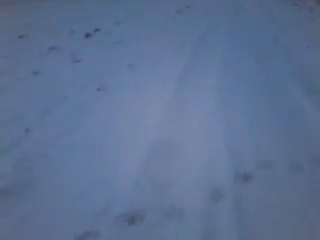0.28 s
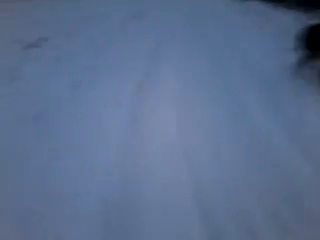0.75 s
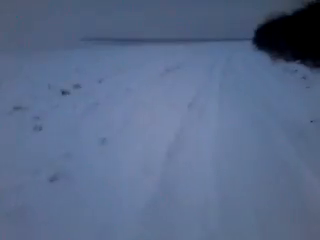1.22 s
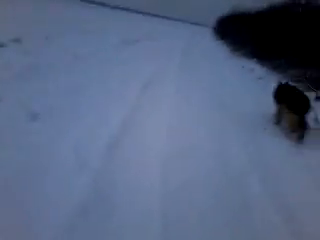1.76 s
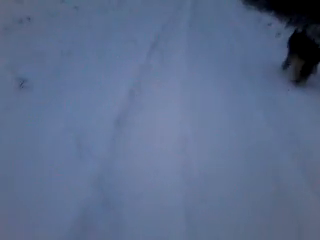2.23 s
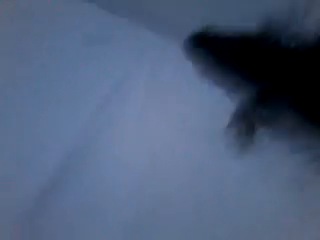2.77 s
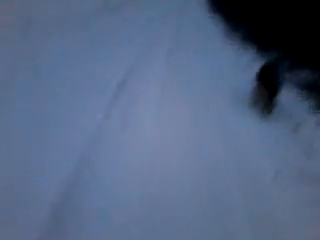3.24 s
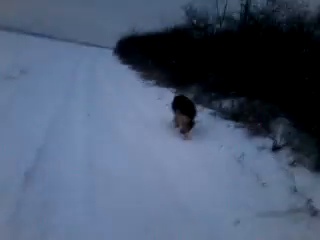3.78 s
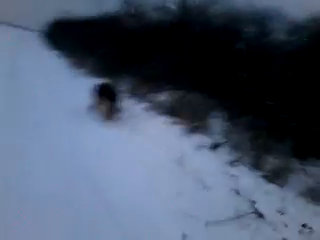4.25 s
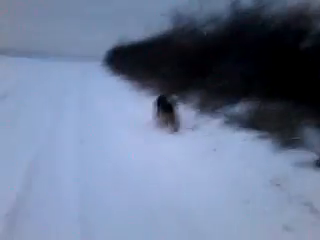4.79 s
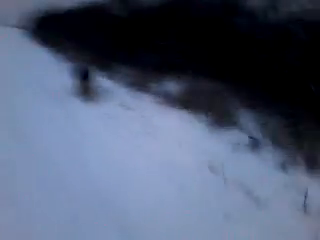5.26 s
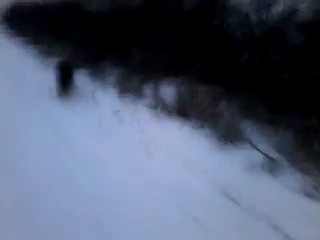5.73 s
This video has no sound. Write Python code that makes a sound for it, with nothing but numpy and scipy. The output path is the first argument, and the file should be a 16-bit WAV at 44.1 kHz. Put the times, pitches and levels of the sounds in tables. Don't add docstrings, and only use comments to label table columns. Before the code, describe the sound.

Footsteps in snow, heard close and dry through a cheap handheld microphone. Fabric brushes and snaps near the start; crust cracks and loose snow slides underfoot, strongest around the middle. The steps then soften to faint packing and rubbing. A sudden burst of loud bumps and harsh dragging follows, then crisp breaking snow and muffled tapping, over thin hiss and a faint high whine.

```python
import sys
import numpy as np
from scipy import signal
from scipy.fft import rfft, irfft
from scipy.io import wavfile
from scipy.ndimage import uniform_filter1d

SR = 44100
rng = np.random.default_rng(int(sys.argv[2]) if len(sys.argv) > 2 else 0)


def transcribe(u):
    v = np.clip(np.atleast_2d(u).T, -1, 1)
    q = np.round(v * 32767).astype(np.int16)
    wavfile.write(sys.argv[1], SR, q)


def undo_db(level):
    steps = np.asarray(level, float) / 20
    return 10 ** steps


N = 265041

PORT_HZ, PORT_WIDTH_HZ = 6400, 1200


def rms_one(x):
    return x / np.sqrt(np.mean(x ** 2) + 1e-20)


def drift(rate_hz):
    r = np.exp(-2 * np.pi * rate_hz / SR)
    wander = signal.lfilter([1], [1, -2 * r, r * r], rng.standard_normal(N + SR))
    return rms_one(wander[SR:])


def coloured(x, spectrum):
    hz, db = np.transpose(spectrum)
    at = np.log(np.fft.rfftfreq(N, 1 / SR) + 1)
    weight = undo_db(np.interp(at, np.log(hz), db, left=-70, right=-70))
    return rms_one(irfft(rfft(x) * weight, N))


def resonance(x, hz, width_hz):
    r = np.exp(-np.pi * width_hz / SR)
    poles = [1, -2 * r * np.cos(2 * np.pi * hz / SR), r * r]
    return signal.lfilter(np.array([1, 0, -1]) * (1 - r * r) / 2, poles, x)


def twice_resonant(x, hz, width_hz):
    return resonance(resonance(x, hz, width_hz), hz, width_hz)


def add(out, s, wave):
    at = max(round(s * SR), 0)
    out[at:at + len(wave)] += wave[:N - at]


def electronics(swish_db):
    # frequency in Hz, hiss density in dB per Hz.
    hiss_spectrum = [(30, 0), (60, -19), (150, -3), (300, -6.5), (1000, -10.5), (2300, -13.5),
                     (4200, -17.5), (6500, -11), (9000, -14.5), (15500, -19)]
    t = np.arange(N) / SR
    gate = undo_db(0.61 * (np.clip(swish_db, -85, -60) + 74.0))
    frame = t * 14.896 % 1
    busy = uniform_filter1d(((frame < .135) | (frame > .445)) * 1., size=90)
    whine = undo_db(-67.5) * busy * np.sin(2 * np.pi * 13000 * t)
    fuzz = undo_db(-80) * rms_one(resonance(rng.standard_normal(N), 13780, 150))
    hiss = undo_db(-69) * coloured(rng.standard_normal(N), hiss_spectrum)
    return gate * (hiss + whine + fuzz)


def strokes(rows):
    s, db, swell_ms, fade_ms = np.transpose(rows)[:, :, None]
    late_ms = np.arange(N * 1000 // SR + 2) - 1000 * s
    distance = np.where(late_ms < 0, -late_ms / swell_ms, late_ms / fade_ms)
    return np.sum(undo_db(db - 20 * distance ** 1.05) ** 2, axis=0)


def rubbing():
    # time of the peak in seconds, peak in dB, swell in ms, fade in ms.
    brushes = [(0.035, -60.5, 8.5, 86), (0.206, -59.5, 28, 31), (0.29, -53.5, 47, 130),
               (0.456, -63.5, 15, 120), (0.593, -41.5, 37, 58), (0.776, -30, 27.6, 7.1),
               (0.79, -51, 10, 55), (2.816, -40, 19, 39), (2.94, -66, 55, 66), (0.345, -52, 22, 28),
               (3.49, -61, 32, 25), (4.585, -54, 29, 40), (5.63, -48, 31, 26), (4.85, -28, 106, 18),
               (4.76, -27, 28, 64), (3, -60, 10, 12), (5.028, -25, 70, 8), (4.95, -28, 10, 50),
               (4.9, -50, 20, 22), (0.57, -42.5, 6.8, 44)]
    grinds = [
        (0.036, -57, 7.2, 37),
        (1.14, -65, 19, 84),
        (1.541, -55, 5, 44),
        (2.501, -48, 127, 147),
        (2.72, -48.5, 22, 21),
        (2.99, -55.5, 33, 52),
        (3.8, -66, 15, 13),
        (2.515, -50, 30, 30),
        (0.665, -62, 20, 54),
        (4.862, -40, 60, 6),
    ]
    packing = [(0.038, -57, 40, 48), (0.205, -69, 47, 62), (0.3, -40.5, 38, 61), (0.581, -65, 15, 550),
               (0.786, -65, 15, 140), (0.94, -57.5, 93, 130), (1.22, -63, 240, 250), (1.388, -77, 26, 26),
               (1.515, -47.5, 14, 81), (1.697, -49, 34, 32), (1.958, -57, 170, 360), (2.055, -47, 12, 33),
               (2.22, -53, 300, 200), (2.385, -53, 180, 1100), (2.66, -48.5, 340, 560),
               (2.816, -46, 18, 120), (2.985, -47.5, 52, 29), (3.081, -52.5, 13, 105),
               (3.183, -49, 9.3, 100), (3.322, -54.5, 110, 290), (3.532, -46, 14, 78),
               (3.725, -50.5, 82, 120), (3.87, -53.5, 130, 250), (4.27, -44.5, 78, 390),
               (5.25, -48, 95, 790), (5.457, -30.5, 33, 35), (5.537, -46, 76, 380), (5.679, -47, 17, 930),
               (5.905, -46, 99, 29), (6.009, -54, 45, 100)]
    slides = [(0.94, -48.5, 66, 84), (1.197, -64, 140, 175), (1.382, -53, 5, 60), (1.515, -57.5, 14, 390),
              (1.636, -50, 160, 66), (1.958, -48.5, 108, 150), (2.105, -65, 19, 230), (2.288, -49, 10, 50),
              (2.39, -46.5, 69, 150), (2.534, -52, 170, 90), (2.724, -57, 62, 530), (2.87, -49, 120, 25),
              (2.99, -60, 39, 54), (3.078, -48.5, 20, 47), (3.183, -68, 30, 360), (2.215, -57, 15, 200),
              (3.49, -64.5, 460, 150), (3.72, -65.5, 79, 170), (3.861, -59.5, 150, 250),
              (4.101, -56.5, 44, 39), (4.27, -58.5, 41, 420), (4.39, -48, 103, 140), (4.495, -51, 68, 60),
              (0.655, -56, 15, 46), (5.365, -44.5, 60, 60), (1.605, -50, 30, 60), (2.13, -57, 20, 45),
              (4.583, -53, 17, 19), (2.005, -45, 12, 24), (5.268, -54, 32, 900), (5.43, -43, 200, 110),
              (5.511, -49, 6, 130), (5.679, -43, 5.5, 9), (5.725, -47.5, 23, 81), (5.905, -52, 87, 29),
              (6.009, -61.5, 46, 100)]
    drags = [
        (4.688, -25.5, 2.7, 144),
        (4.707, -22.5, 15, 44),
        (4.76, -33, 61, 33),
        (4.855, -38.5, 72, 27),
        (4.9, -50, 37, 18),
        (4.936, -23.5, 2.9, 55),
        (4.99, -31, 18, 45),
        (5.021, -28.5, 41, 20),
        (5.035, -42, 20, 15),
    ]
    kinds = [(packing, (-1.5, -15.5, -42, -23)), (slides, (-40, -7.5, -1.5, -8)),
             (brushes, (-38, -16.5, -11, -2.5)), (drags, (-5.5, -7, -1.5, -3)),
             (grinds, (-16, 4.5, -2.5, -7))]
    power = undo_db(-84) ** 2
    for rows, mix_db in kinds:
        power = power + undo_db(mix_db)[:, None] ** 2 * strokes(rows)
    ms = np.arange(N) / SR * 1000
    return [np.interp(ms, np.arange(len(p)), 10 * np.log10(p)) for p in power]


def grains(per_s, spread_db, clump):
    sizes = undo_db(spread_db * np.minimum(rng.exponential(1, N), 4)) * rng.standard_normal(N)
    return sizes * (rng.random(N) < per_s * clump / SR)


def lumps(levels_by_hz, per_s, clump, cycles):
    hz, db = np.transpose(levels_by_hz)
    pitches = np.geomspace(hz[0], hz[-1], num=12)
    dealt = rng.integers(0, 12, N)
    hits = grains(per_s, 1.6, clump) + 1e-18
    levels = undo_db(np.interp(np.log(pitches), np.log(hz), db))
    total = np.zeros(N)
    for k, (f, level) in enumerate(zip(pitches, levels)):
        total += level * rms_one(twice_resonant(hits * (dealt == k), f, f / cycles))
    return rms_one(total)


def tilted(x):
    # time in seconds, level of the upper half over the lower in dB.
    fineness_by_time = [(1.5, 0), (1.65, -3), (1.95, 1), (4.4, 2), (4.7, -2), (4.84, 5), (4.95, 0),
                        (5.03, 2), (5.34, 3), (5.44, -5), (5.52, 0)]
    half_db = np.interp(np.arange(N) / SR, *np.transpose(fineness_by_time)) / 2
    split = signal.butter(5, 6200, fs=SR, output="sos")
    low = signal.sosfiltfilt(split, x)
    return low * undo_db(-half_db) + (x - low) * undo_db(half_db)


def friction(rumble_db, crunch_db, rustle_db, swish_db):
    # frequency in Hz, level of a lump ringing there in dB.
    rumble_levels = [(70, -7), (200, -3.5), (450, 0.5), (1100, -9)]
    crunch_levels = [(900, -1), (1500, 1.5), (2200, 1), (3200, 0), (4600, -9.5)]
    # frequency in Hz, density in dB per Hz.
    rustle_spectrum = [(3000, -17), (4500, -10.5), (5600, -5), (6600, -1), (7800, -7), (9300, -15),
                       (11000, -49)]
    swish_spectrum = [(5500, -30), (7500, -9), (9000, -5), (10300, 0), (12300, -4.5), (14700, -3.5),
                      (15600, -9)]
    uneven = np.interp(swish_db, [-47.5, -31.5], [1, .35])
    flurry = uneven * (1.9 * drift(40) + 2.9 * drift(90))
    clump = undo_db(2.3 * uneven * drift(60))
    rumble_gain = undo_db(rumble_db - 4.5 + 0.8 * drift(30) + 0.3 * flurry)
    rumble = lumps(rumble_levels, 600, clump, cycles=2.18) * rumble_gain
    crunch = lumps(crunch_levels, 8000, clump, cycles=1.36) * undo_db(crunch_db - 3.5 + 0.43 * flurry)
    rustle = tilted(coloured(grains(12000, 2.0, clump), rustle_spectrum))
    rustle = rustle * undo_db(rustle_db + 0.5 + 0.6 * flurry)
    swish = coloured(grains(20000, 1.5, clump), swish_spectrum) * undo_db(swish_db - 2.0 + .45 * flurry)
    return rumble + crunch + rustle + swish


def cracks(rows, ms, breadth=.9, port=1.2):
    out, t = np.zeros(N), np.arange(round(.03 * SR)) / SR
    splinters = np.exp(-t / .004)
    fall = ms / 1000 / 2.2
    noise = rng.standard_normal((len(rows), len(t)))
    for (s, db, hz), burst in zip(rows, noise):
        width = breadth * hz
        click = 1.8 * np.sqrt(fall * SR) * np.sign(burst[0]) * (t == 0) / 2
        snap = twice_resonant(burst * np.exp(-t / fall) + click, hz, width)
        snap = snap + port * resonance(snap, PORT_HZ, PORT_WIDTH_HZ)
        tail = rms_one(twice_resonant(burst, hz, width)) * splinters
        add(out, s - fall / 2, undo_db(db - 5.5) * (snap / np.abs(snap).max() + undo_db(-15) * tail))
    return out


def thuds(rows, cycles, rough=.36, grit=.02, weight=.2):
    out, t = np.zeros(N), np.arange(round(.09 * SR)) / SR
    noise, start = rng.standard_normal((len(rows), len(t))), rng.random(len(rows))
    for (s, db, hz), puff, turn in zip(rows, noise, start):
        rise = cycles / hz / 2.4
        shape = (t / rise * np.exp(1 - t / rise)) ** 1.7
        tone = np.sin(2 * np.pi * (turn + hz * t))
        snow = rms_one(twice_resonant(puff, 1.54 * hz, 1.68 * hz))
        crumbs = rms_one(twice_resonant(puff[::-1], 3.5 * hz, 2.5 * hz))
        swell = (t / rise / 1.76 * np.exp(1 - t / rise / 2.1)) ** 2
        push = swell * np.sin(2 * np.pi * (turn + 0.45 * hz * t))
        contact = shape * (tone + rough * snow + grit * crumbs) + weight * push
        add(out, s - rise, undo_db(db + 0.23) * contact)
    return out


def shards():
    # time of the peak in seconds, peak in dB.
    edges = [(0.036, -42), (1.3865, -36), (1.5088, -38), (2.054, -35), (2.1145, -39), (2.3797, -27),
             (2.3925, -33), (2.429, -33), (2.496, -35), (3.919, -42), (4.37, -38), (5.3228, -25),
             (5.331, -33), (5.4553, -23), (5.5075, -33), (5.678, -37)]
    return cracks([(s, db, 12500) for s, db in edges], ms=.5, breadth=0.8, port=.1)


def pops():
    # time of the peak in seconds, peak in dB, centre in Hz.
    small_breaks = [(0.0361, -31, 975), (0.297, -38, 989), (1.5093, -29, 1210), (2.0621, -37, 1500),
                    (2.381, -23, 1350), (2.3933, -31, 2200), (2.4297, -31, 2200), (2.459, -33, 1230),
                    (2.524, -35, 2000), (2.546, -39, 1300), (2.8742, -35, 2200), (4.264, -42, 1210),
                    (4.7285, -22, 2300), (4.7438, -19.5, 1110), (4.7484, -22, 1260), (4.776, -35, 1260),
                    (4.8545, -39, 2000), (4.861, -41, 1600), (4.8806, -33, 1500), (4.9903, -36, 1140),
                    (5.0092, -23.5, 2330), (5.446, -34, 2300), (5.4828, -29, 1015), (5.518, -24, 1080),
                    (5.5389, -30, 2060), (5.5485, -37, 1030), (5.7221, -32, 1075), (5.7335, -38, 1040),
                    (2.286, -38, 2600), (2.4895, -36, 1700), (2.512, -39, 2000), (2.535, -37, 2200),
                    (2.475, -38, 2600), (5.749, -34, 1980)]
    return cracks(small_breaks, ms=1.68, breadth=0.83, port=.3)


def crust():
    # time of the peak in seconds, peak in dB, centre in Hz.
    breaks = [(0.0362, -35, 2620), (1.5092, -19, 4050), (1.5379, -28.5, 1860), (1.887, -30.5, 4580),
              (1.958, -28, 2620), (2.0542, -27.5, 2290), (2.0565, -25, 4600), (2.3803, -15, 3700),
              (2.4585, -17.5, 3950), (2.4967, -22, 1720), (2.5843, -31.5, 3870), (2.611, -36, 5200),
              (2.7185, -28, 1350), (2.868, -29.5, 4170), (3.077, -34.5, 1930), (4.7, -24, 1790),
              (5.3235, -26, 1900), (5.4455, -22, 4700), (5.4552, -8, 2250), (5.4556, -10.5, 4800),
              (5.517, -34, 2200), (5.5376, -22.5, 4300), (5.6233, -26.5, 4500), (5.678, -19, 2170),
              (5.6809, -16.5, 4300), (5.6853, -18, 2400), (5.7477, -35, 3760), (5.78, -34.5, 2520)]
    return cracks(breaks, ms=1.5, breadth=0.66, port=2.4)


def taps():
    # time of the peak in seconds, peak in dB, pitch in Hz.
    touches = [(0.037, -40.5, 465), (0.2612, -30, 507), (1.5093, -55, 790), (1.5411, -51, 546),
               (2.2865, -43, 624), (2.3834, -41, 780), (2.7461, -39.5, 497), (3.076, -47, 685),
               (3.3633, -39.5, 613), (4.0212, -46.5, 514), (5.2463, -45, 704), (5.3161, -45, 454),
               (5.4458, -31, 684), (5.4562, -22, 820), (5.4701, -32, 565), (5.4834, -39, 630),
               (5.5109, -29, 640), (5.519, -30, 730), (5.5397, -29, 556), (5.5616, -32, 670),
               (5.582, -46, 560), (5.568, -38, 700), (5.6826, -24.5, 995), (5.7095, -36.5, 660),
               (5.7279, -37, 580), (5.7504, -40.5, 476), (5.8904, -44, 378), (5.9113, -47, 201)]
    return thuds(touches, cycles=2.68, rough=0.19, grit=.008, weight=0.059)


def creaks():
    # time of the peak in seconds, peak in dB, pitch in Hz; 50 Hz at 4.705 s and 420 Hz at 4.938 s
    settlings = [(0.04, -42, 230), (0.2715, -32, 258), (0.326, -44, 192), (1.518, -48, 170),
                 (2.1359, -46, 231), (2.4265, -47, 238), (2.4849, -47.5, 207), (2.6058, -39.5, 557),
                 (2.7611, -48, 424), (2.8162, -48, 584), (2.8638, -46, 495), (2.8725, -40.5, 78.8),
                 (2.9947, -48, 208), (3.5275, -47.5, 220), (3.73, -49, 416), (4.1681, -49.5, 544),
                 (4.1025, -50, 500), (4.021, -54, 115), (4.875, -42, 300), (5.585, -47, 200),
                 (5.53, -45, 280), (4.174, -47, 150), (4.275, -39, 233), (4.3062, -44, 252),
                 (4.3622, -47, 456), (4.5737, -48.5, 256), (4.7065, -28, 200), (4.7442, -29, 475),
                 (4.771, -39, 190), (4.8634, -44, 460), (5.0305, -41, 75), (4.955, -30, 90),
                 (4.705, -40, 50), (4.9378, -27, 420), (3.66, -53, 178), (3.77, -49, 230),
                 (3.283, -51, 330), (3.88, -49.5, 400), (3.118, -49, 280), (2.335, -52, 450),
                 (5.2095, -50, 520), (5.309, -43, 243), (5.3236, -42, 577), (5.345, -46, 350),
                 (5.3957, -47, 520), (5.4424, -34.5, 298), (5.6327, -49.5, 485), (5.6885, -31.5, 620),
                 (5.565, -39, 720), (5.456, -27, 330), (5.9034, -49, 537)]
    return thuds(settlings, cycles=1.91, weight=0.086)


def treads():
    # time of the peak in seconds, peak in dB, pitch in Hz.
    steps = [(0.2036, -50.5, 206), (0.458, -46.5, 204), (0.783, -50.5, 89), (1.242, -43.5, 267),
             (1.3856, -40, 170), (1.4592, -46.5, 178), (1.6903, -37, 191), (1.698, -43, 98),
             (1.8867, -40.5, 273), (1.9382, -36.5, 275), (2.0647, -34.5, 234), (2.1528, -37.5, 225),
             (2.611, -35.5, 181), (2.678, -36.5, 220), (2.8712, -34, 141), (2.885, -48, 83),
             (3.1867, -37, 210), (3.228, -42.5, 273), (3.3088, -37.5, 231), (3.5799, -41, 226),
             (3.7194, -36.5, 192), (4.105, -48, 115), (4.1844, -41, 190), (4.29, -41, 215),
             (4.3253, -45, 212), (4.659, -39.5, 237), (4.7606, -33, 233), (4.897, -41, 66.6),
             (5.0017, -39, 164), (5.044, -45, 94)]
    return thuds(steps, cycles=1.773)


def grips():
    # time of the peak in seconds, peak in dB, pitch in Hz.
    shifts = [(0.2675, -29, 500), (0.301, -36, 310), (0.309, -45, 337), (0.3198, -39.5, 326),
              (0.774, -42.5, 312), (1.848, -48, 465), (2.0076, -43.5, 310), (2.2142, -37.5, 378),
              (2.2313, -34, 420), (2.6211, -39, 340), (2.6597, -57, 292), (2.85, -45, 350),
              (2.9801, -50, 453), (3.1163, -54, 405), (3.3192, -39, 410), (3.4188, -46.5, 437),
              (3.447, -48.5, 340), (3.5357, -39, 376), (3.7406, -39, 366), (3.8063, -39, 320),
              (3.9727, -48, 230), (4.264, -40.5, 332), (4.385, -42, 423), (4.9853, -51, 354),
              (5.2543, -53, 353), (5.371, -38.5, 424), (5.4072, -42, 277), (5.7885, -38, 450),
              (5.864, -43, 397), (5.9832, -45.5, 400)]
    return thuds(shifts, cycles=2.113)


def ticks():
    # time of the peak in seconds, peak in dB.
    crystals = [(0.577, -19.5), (0.742, -27.5), (0.765, -43), (0.7713, -7.5), (2.7652, -21.5),
                (2.7732, -22), (2.8103, -25), (2.9203, -31), (2.965, -34), (4.3111, -28.5), (4.3546, -32),
                (4.453, -30), (4.494, -24), (4.9, -23), (4.9055, -36), (5.2646, -34), (5.5722, -28),
                (5.628, -28)]
    return cracks([(s, db, 9700) for s, db in crystals], ms=.6, breadth=0.73, port=.3)


def crackle():
    # time of the peak in seconds, peak in dB, centre in Hz.
    crystals = [(0.6236, -32, 6200), (0.6576, -35.5, 6600), (0.7641, -21, 9500), (0.7778, -10.5, 6600),
                (1.5818, -35, 6300), (1.5995, -37, 6300), (1.621, -35, 6300), (1.6446, -35, 6300),
                (1.9524, -32, 6500), (2.0024, -29, 7000), (2.0102, -32, 7000), (2.4881, -33, 6000),
                (2.7173, -25, 6040), (2.7739, -26, 10600), (2.7807, -36, 9500), (2.7823, -36, 9500),
                (3.4828, -40, 8500), (4.3223, -34, 10500), (4.3367, -33, 10500), (4.4868, -28, 6500),
                (4.8965, -34, 10000), (5.3524, -31, 6600), (5.3585, -26, 6600), (5.3856, -30, 6000),
                (5.429, -28, 5600), (5.6815, -20, 4620), (2.4965, -26, 6000), (2.4585, -23, 4170),
                (2.4459, -32, 6200), (2.5335, -31, 6200), (5.3035, -34, 4200), (4.7005, -12, 6000),
                (4.9375, -10, 6800), (5.3676, -28, 6000), (5.4754, -41, 6540), (5.5843, -33, 10500),
                (5.6384, -33, 9500)]
    return cracks(crystals, ms=.8, breadth=0.37, port=.4)


def snaps():
    # time of the peak in seconds, peak in dB, centre in Hz.
    folds = [(0.7753, -16.5, 7100), (1.3865, -28.5, 7150), (1.3938, -26.5, 6640), (1.5382, -29, 5800),
             (1.5895, -35, 6300), (2.1147, -29.5, 6640), (2.3924, -26, 5700), (2.4293, -17.5, 5900),
             (2.5317, -23.5, 5100), (2.874, -47, 4900), (3.919, -26.5, 5500), (4.6973, -7, 6500),
             (4.7074, -5, 6300), (4.936, -5, 5960), (5.0092, -10, 7200), (5.0843, -33, 6430),
             (5.3032, -38, 6360), (5.3232, -19.5, 6600), (5.331, -28, 6840), (5.5082, -25, 5900),
             (5.728, -30, 5400)]
    return cracks(folds, ms=1.1, breadth=0.47)


def knocks():
    # time in seconds, push in dB, swing in dB, swing in Hz, 60 dB decay of the swing in seconds.
    blows = [
        (4.684, -8.5, -7, 170, 0.028),
        (4.7006, -13, -12, 330, 0.01),
        (4.9321, -8.5, -7.5, 200, 0.03),
    ]
    push_s = .00005
    out, t = np.zeros(N), np.arange(round(.1 * SR)) / SR
    for s, push_db, swing_db, hz, t60 in blows:
        push = undo_db(push_db) * t / push_s * np.exp(1 - t / push_s)
        settle = undo_db(push_db - 4.0) * np.exp(-t / 0.00094) * (t > push_s)
        slowing = hz * t / (1 + 45 * t)
        swing = -undo_db(swing_db - 60 * t / t60) * np.sin(2 * np.pi * slowing)
        ringing = 3.5 * resonance(push, PORT_HZ, PORT_WIDTH_HZ)
        add(out, s - push_s, push + settle + swing + ringing)
    return out


def scene():
    rub_db = rubbing()
    steady = electronics(rub_db[-1]) + friction(*rub_db)
    sharp = shards() + pops() + crust() + ticks() + crackle() + snaps()
    soft = taps() + creaks() + treads() + grips()
    return (steady + sharp + soft + knocks())[None]


def band_limit(x):
    return signal.sosfilt(signal.butter(12, 16370, fs=SR, output="sos"), x)


def record(dry):
    low_pass = signal.cheby2(14, 38, 15180, fs=SR, output="sos")
    mix = signal.sosfilt(low_pass, dry)
    return band_limit(mix)


dry = scene()
out = record(dry)
transcribe(out)
```